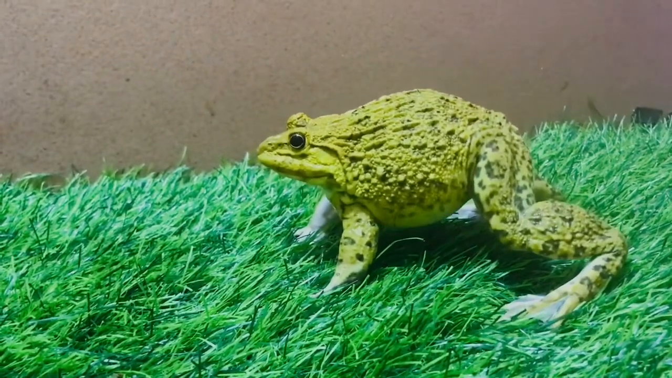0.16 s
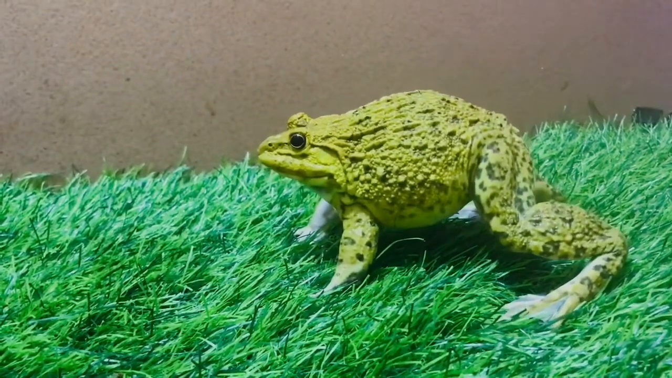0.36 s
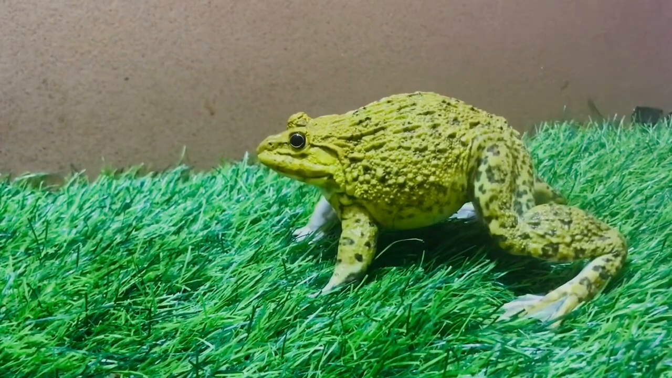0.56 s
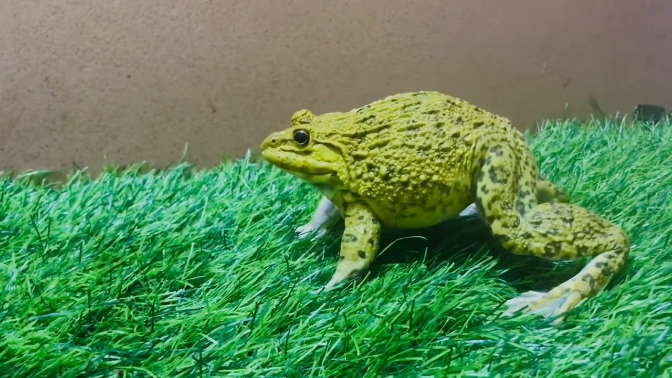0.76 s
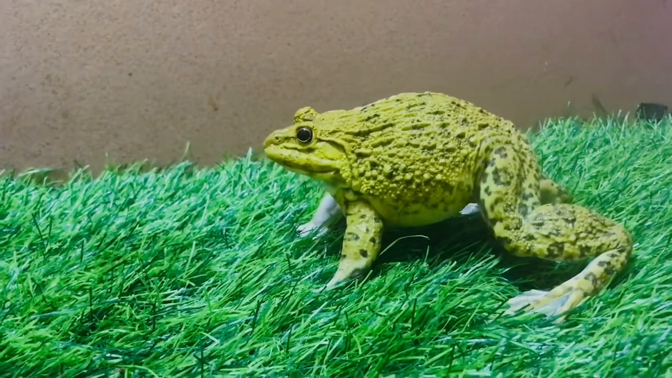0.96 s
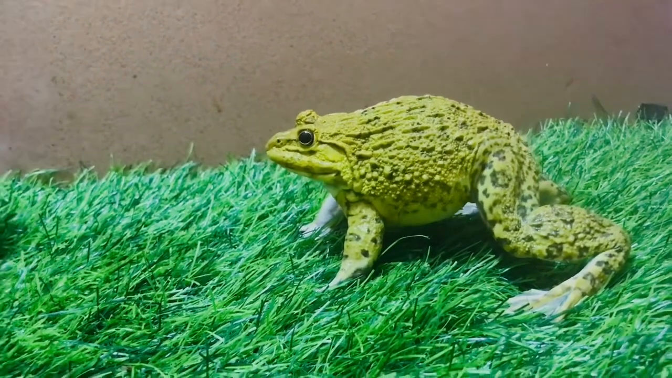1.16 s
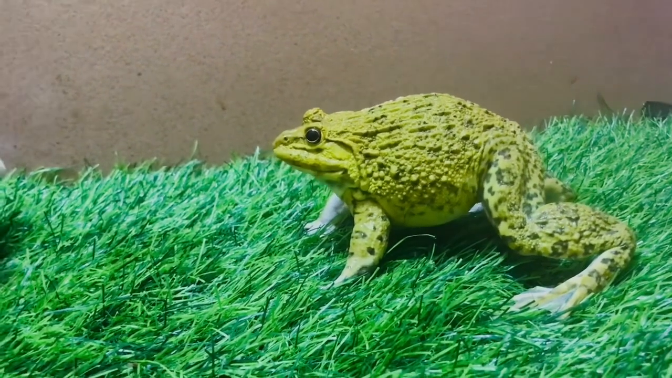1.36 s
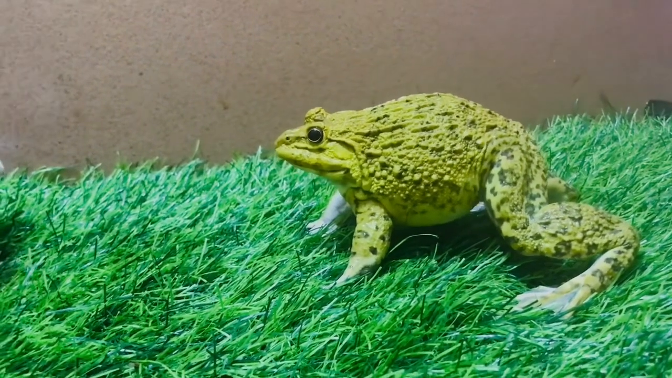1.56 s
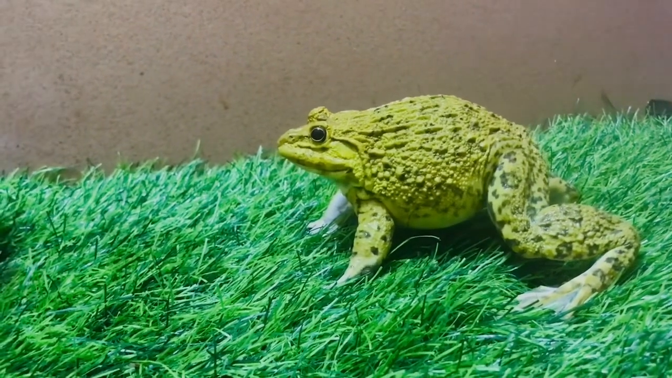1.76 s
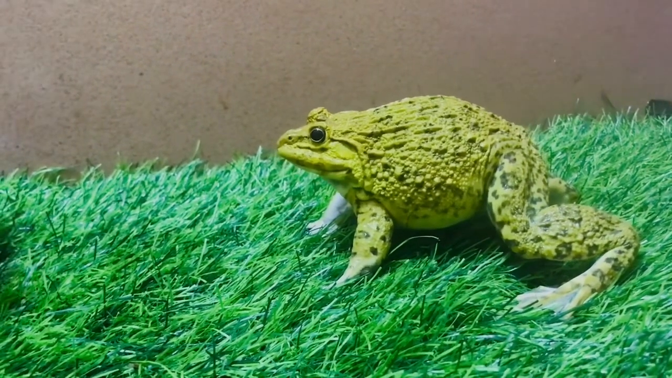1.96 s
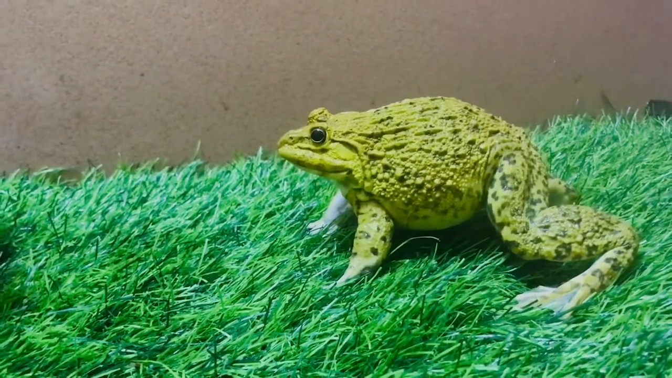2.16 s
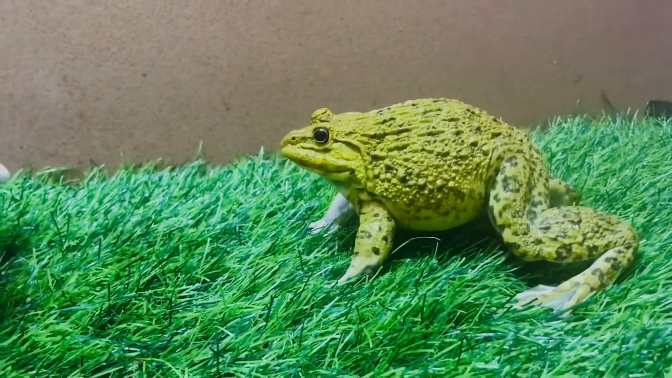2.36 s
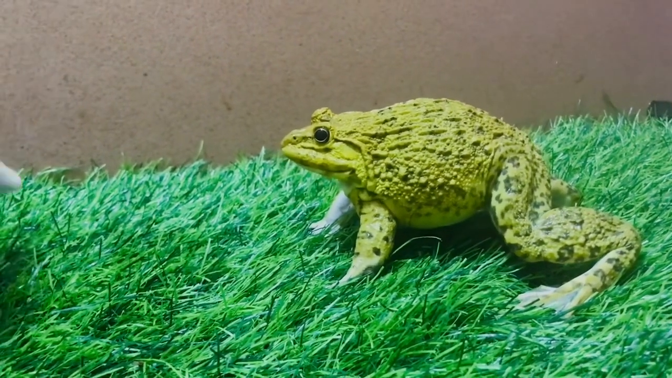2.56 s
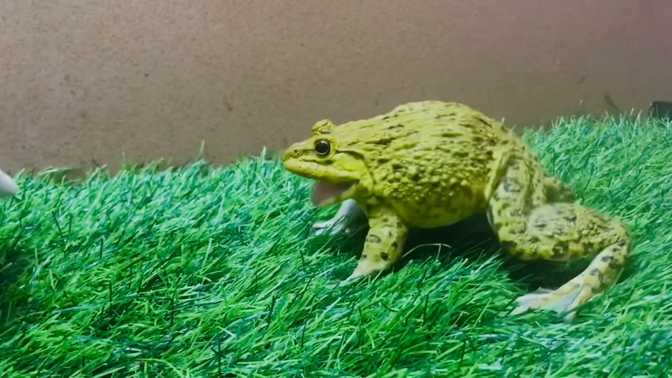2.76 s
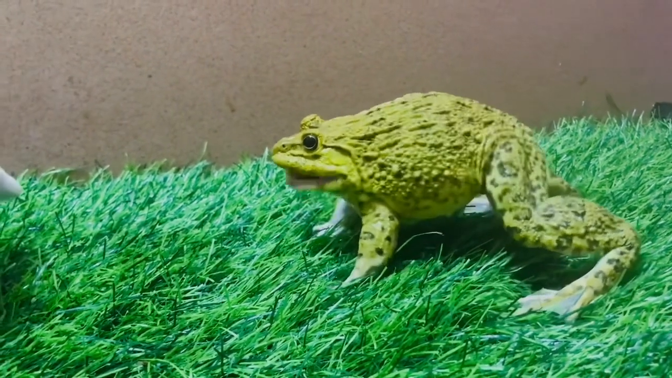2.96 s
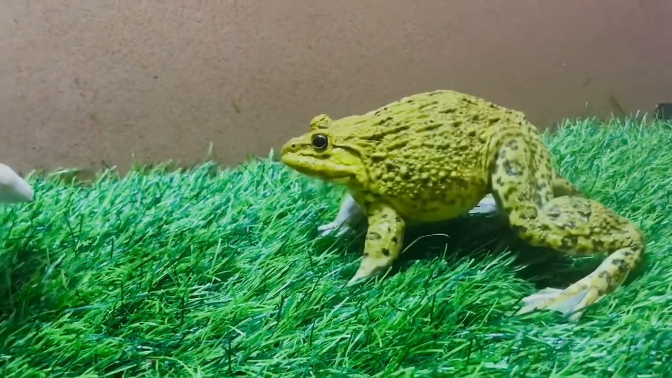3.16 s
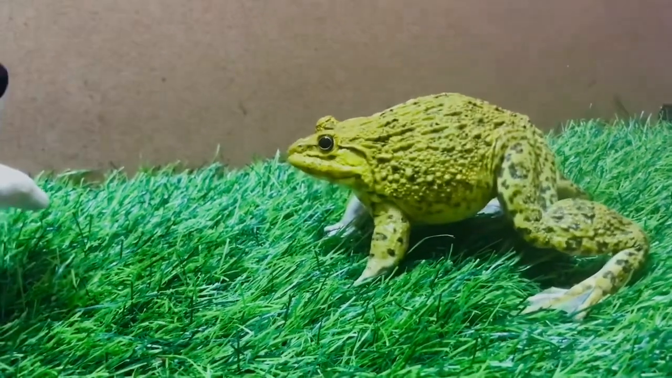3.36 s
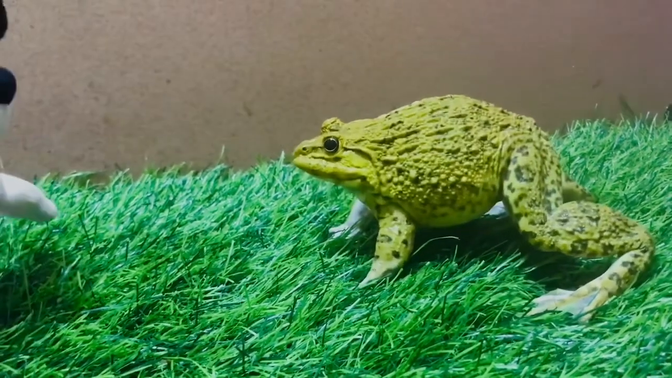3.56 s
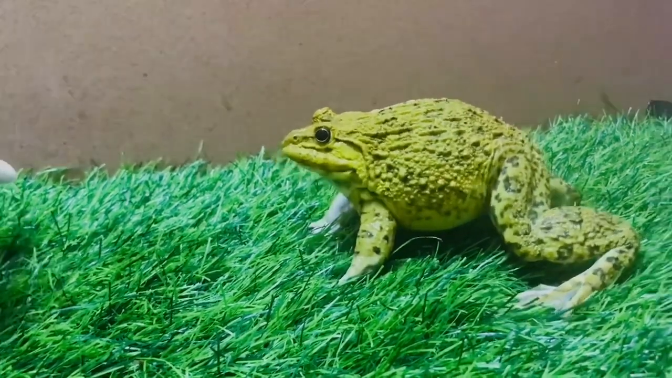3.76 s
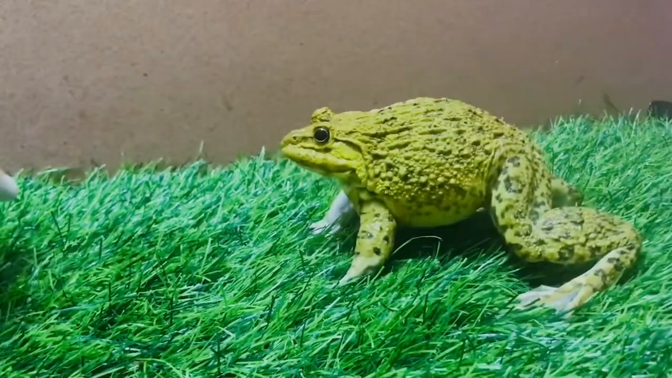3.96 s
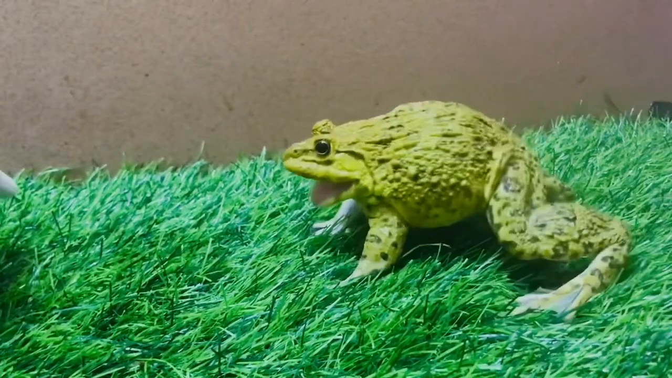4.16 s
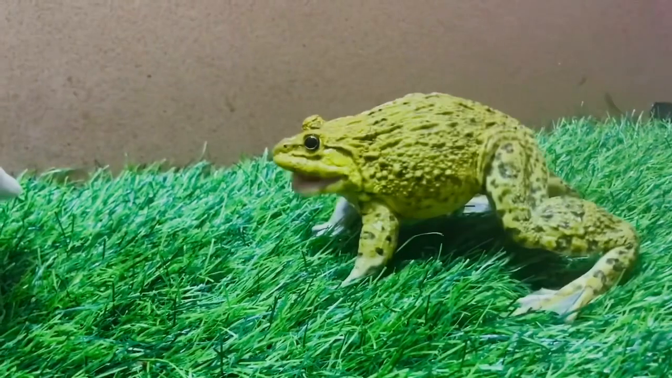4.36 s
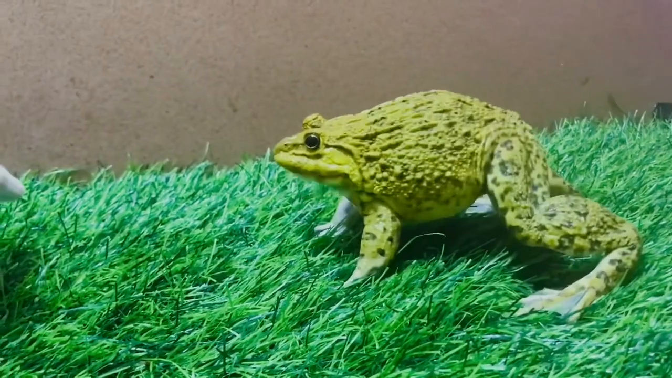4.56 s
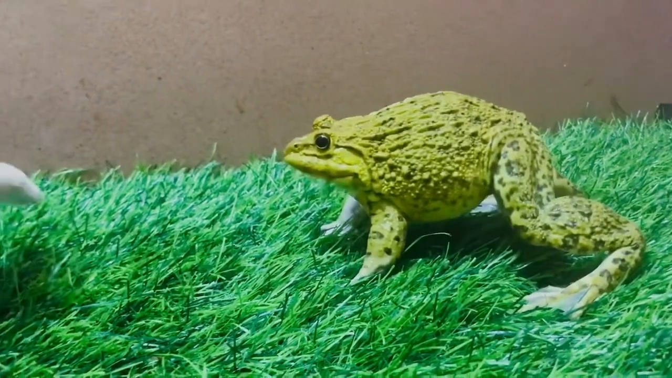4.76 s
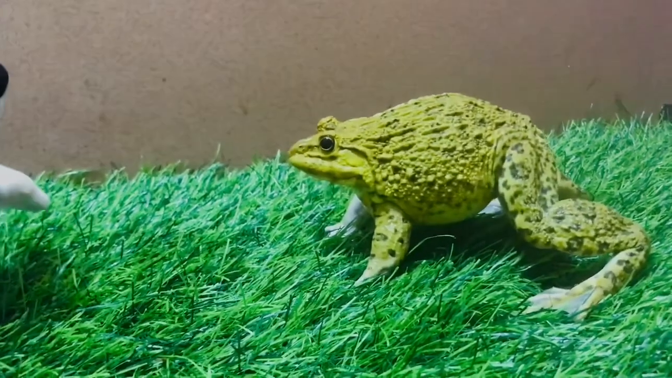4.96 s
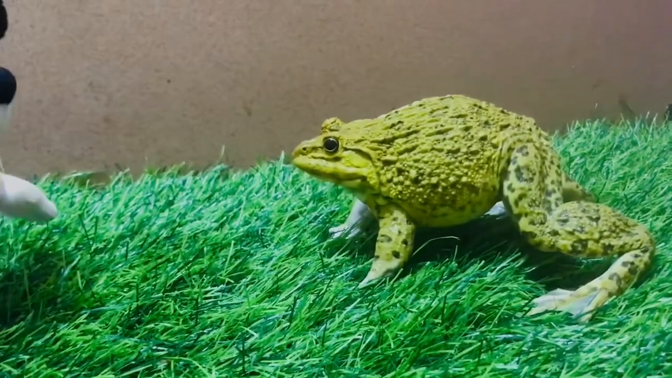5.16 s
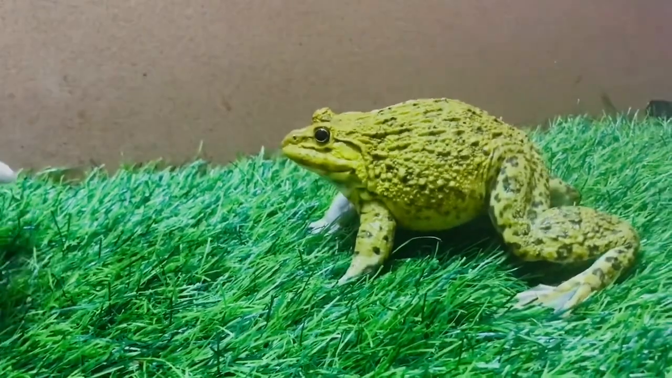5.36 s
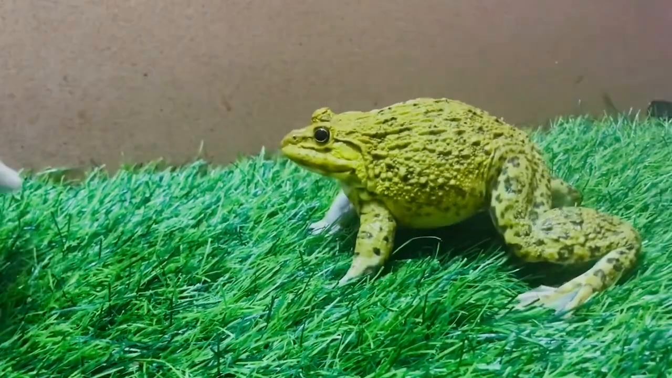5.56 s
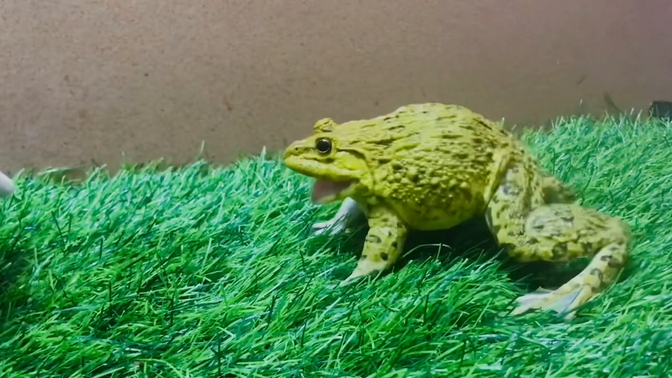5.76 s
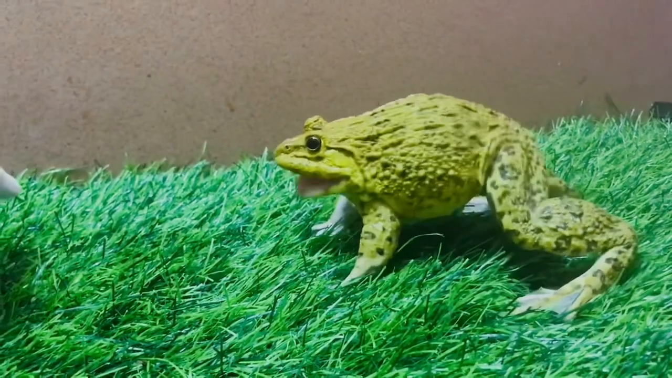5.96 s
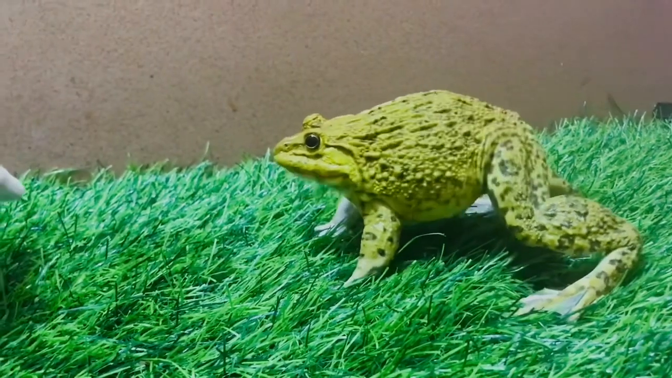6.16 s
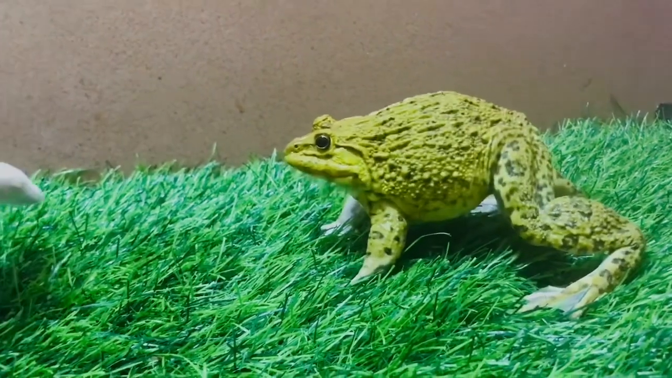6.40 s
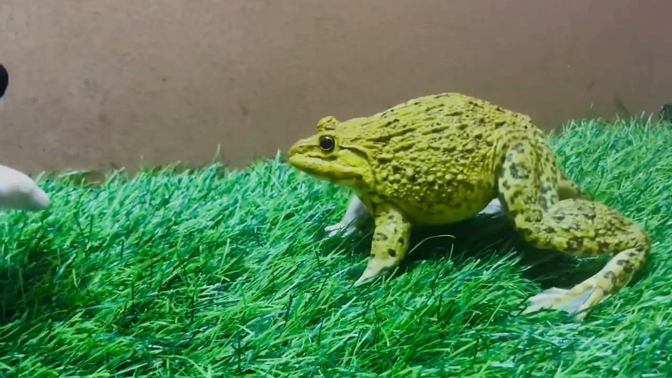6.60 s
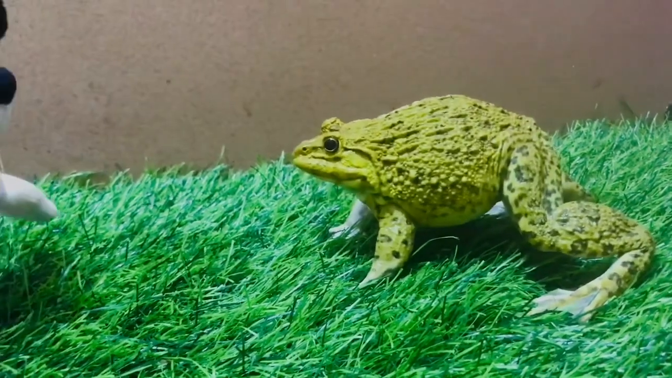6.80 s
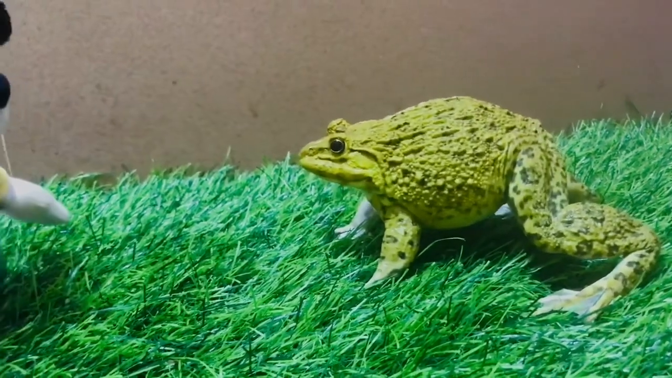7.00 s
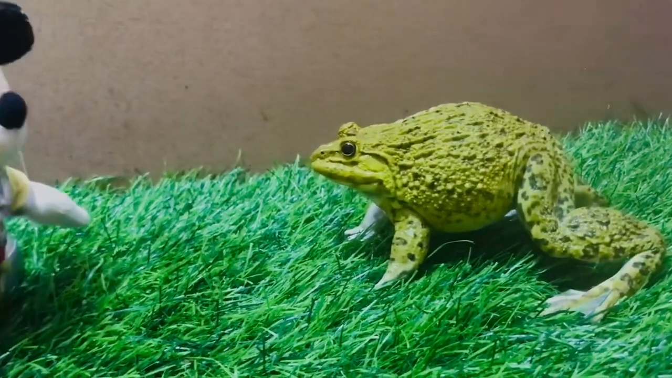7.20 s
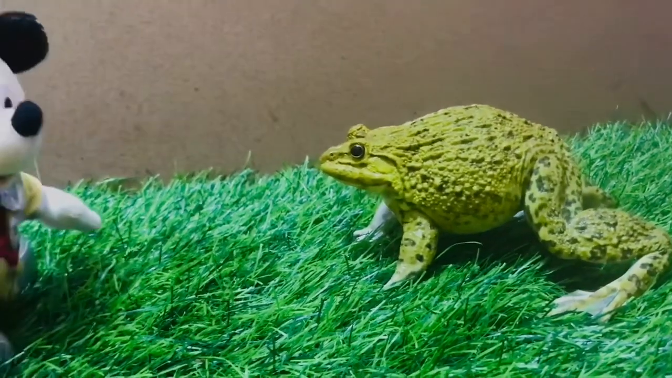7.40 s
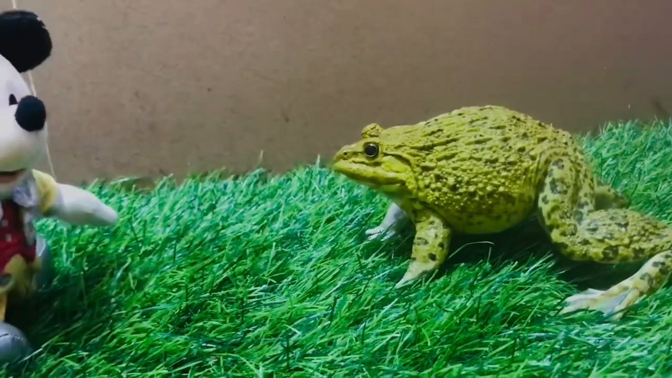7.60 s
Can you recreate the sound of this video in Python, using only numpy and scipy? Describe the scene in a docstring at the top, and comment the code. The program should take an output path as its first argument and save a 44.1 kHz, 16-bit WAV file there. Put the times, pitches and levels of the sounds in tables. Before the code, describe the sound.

A bullfrog gives one short, piercing, falling scream in a small fan-hummed room, then the same scream returns twice, slower and lower.

```python
"""A fan hums and hisses in a small room (wavering sines, shaped noise) as a soft toy brushes plastic turf. The
toy's strokes, ticks and scuffs are swells of band noise; dull low bumps come as short sine bursts. A teased
bullfrog screams once, mouth wide open: a shrill pulse tone through throat resonances shoots up, sinks, breaks
to a lower register and ends in a rasp; the frog then settles with a soft thump."""
import sys
import numpy as np
from scipy import signal
from scipy.fft import rfft, irfft
from scipy.io import wavfile
from scipy.ndimage import uniform_filter1d, minimum_filter1d, map_coordinates

SR = 44100
rng = np.random.default_rng(int(sys.argv[2]) if len(sys.argv) > 2 else 0)


def dump_mix(stems):
    """Bounce the given channels to the path in sys.argv[1] as a 16-bit WAV at rate SR."""
    frames = np.atleast_2d(stems).T  # one column per channel
    limited = np.clip(frames, -1, 1)  # hard clip at full scale
    pcm = np.round(limited * 32767).astype(np.int16)
    wavfile.write(sys.argv[1], SR, pcm)


N = 336744
TIME = np.arange(N) / SR
FREQS = np.arange(N // 2 + 1) * SR / N


def from_db(db):
    """Decibels to gain."""
    return 10 ** (np.asarray(db) / 20)


def rms_one(x):
    """Scale to rms 1."""
    return x / np.sqrt(np.mean(x ** 2) + 1e-20)


def at_hz(points, hz):
    """Read a spectrum, interpolated on a log-frequency axis."""
    point_hz, value = np.transpose(points)
    return np.interp(np.log(np.maximum(hz, 1)), np.log(point_hz), value)


def noise(colour):
    """Noise of a given spectrum, rms 1."""
    white = rfft(rng.standard_normal(N))
    return rms_one(irfft(white * from_db(at_hz(colour, FREQS)), N))


def band_noise(hz, width_hz, size):
    """Noise twice through one resonance, rms 1."""
    centre_hz = min(hz, .45 * SR)
    q = hz / min(np.pi / 2 * width_hz, .4 * SR)
    b, a = signal.iirpeak(centre_hz, q, fs=SR)
    once = signal.lfilter(b, a, rng.standard_normal(size))
    return rms_one(signal.lfilter(b, a, once))


def flutter(rate_hz, size):
    """Random wavering up to a given rate, rms 1."""
    lowpass = signal.butter(2, rate_hz, fs=SR, output="sos")
    return rms_one(signal.sosfilt(lowpass, rng.standard_normal(size)))


def swell(peak_s, length_s, level_db):
    """Gaussian gain around peak_s; length_s is its standard deviation."""
    exponent = np.minimum(((TIME - peak_s) / length_s) ** 2, 200) / 2
    return from_db(level_db) * np.exp(-exponent)


# fan motor lines: [freq_hz, level_db (rms)]
MOTOR_LINES = [(46, -63), (68, -64.5), (100, -56), (345, -62.5)]
# fan rush and hiss spectrum: [freq_hz, relative_density_db]
RUSH_SPECTRUM = [(20, -34.5), (42, -12), (70, 0.5), (110, -8), (135, -9.5), (275, -13.5), (295, -3),
                 (335, -6), (370, -13), (600, -22), (1200, -31.5), (2300, -33.5), (5500, -37.5),
                 (11000, -38.5), (16000, -46)]
# faint whistling bands in the hiss: [centre_hz, width_hz, level_db (rms)]
WHISTLE_BANDS = [(937, 32, -80.5), (1502, 140, -79), (2976, 220, -77.5), (3980, 150, -74),
                 (6870, 260, -80.5), (8990, 210, -77)]


def fan(rush_db=-55, waver=.1, whistle_waver_db=3.5):
    """Wavering motor lines and faint whistles over a low rush and a thin hiss."""
    lines = 0
    for freq_hz, level_db in MOTOR_LINES:
        tone = np.sqrt(2) * np.sin(2 * np.pi * (freq_hz * TIME + rng.random()))
        lines = lines + from_db(level_db) * tone * (1 + waver * flutter(7.1, N))
    whistles = 0
    for centre_hz, width_hz, level_db in WHISTLE_BANDS:
        gain = from_db(level_db + whistle_waver_db * flutter(4.2, N))
        whistles = whistles + gain * band_noise(centre_hz, width_hz, N)
    return lines + whistles + from_db(rush_db) * noise(RUSH_SPECTRUM)


# toy strokes over the turf: [peak_s, length_s, level_db, centre_hz, width_hz]
TOY_STROKES = [(0.783, 0.13, -65.5, 8700, 9100), (1.054, 0.046, -59, 3560, 6000),
               (1.07, 0.034, -59.5, 11300, 2000), (2.047, 0.041, -65, 6770, 10000),
               (2.57, 0.072, -59, 3860, 6500)]
# single blades flick back: [peak_s, level_db]
BLADE_TICKS = [(1.163, -54), (1.175, -58), (3.588, -59), (7.41, -65)]
TICK_S, TICK_HZ, TICK_WIDTH_HZ = 0.0012, 3570, 4000
# toy scuffs the mat as it is shuffled closer: [peak_s, length_s, level_db]
MAT_SCUFFS = [(7.196, .02, -65), (7.261, 0.0027, -56.5), (7.309, .018, -59)]
SCUFF_HZ, SCUFF_WIDTH_HZ = 899, 335
# low rumble of that shuffle
SHUFFLE_AT_S, SHUFFLE_S, SHUFFLE_DB, SHUFFLE_HZ, SHUFFLE_WIDTH_HZ = 7.19, 0.076, -56.5, 200, 130


def toy(grain_db=2.0):
    """Grainy strokes over plastic blades, ticks of single blades, and a scuffing shuffle over the mat."""
    strokes = 0
    for peak_s, length_s, level_db, centre_hz, width_hz in TOY_STROKES:
        strokes = strokes + swell(peak_s, length_s, level_db) * band_noise(centre_hz, width_hz, N)
    tick_gain = sum(swell(peak_s, TICK_S, level_db) for peak_s, level_db in BLADE_TICKS)
    ticks = tick_gain * band_noise(TICK_HZ, TICK_WIDTH_HZ, N)
    scuff_gain = sum(swell(*scuff) for scuff in MAT_SCUFFS)
    scuffs = scuff_gain * band_noise(SCUFF_HZ, SCUFF_WIDTH_HZ, N)
    rumble_gain = swell(SHUFFLE_AT_S, SHUFFLE_S, SHUFFLE_DB)
    rumble = rumble_gain * band_noise(SHUFFLE_HZ, SHUFFLE_WIDTH_HZ, N)
    return (strokes + ticks + scuffs + rumble) * from_db(grain_db * flutter(200, N))


def boom(peak_s, length_s, level_db, hz):
    """A dull, quickly damped sine burst."""
    return swell(peak_s, length_s, level_db) * np.sin(2 * np.pi * hz * (peak_s - TIME))


# dull low bumps: [peak_s, level_db]
LOW_BUMPS = [(.71, -47), (0.949, -45.5), (1.4, -50), (1.889, -47), (2.53, -51), (3.27, -41.5)]
BUMP_S, BUMP_HZ = 0.028, 66.6


def bumps():
    """Dull low bumps, a few cycles each."""
    return sum(boom(peak_s, BUMP_S, level_db, BUMP_HZ) for peak_s, level_db in LOW_BUMPS)


# mat modes under the settling frog: [freq_hz, level_db, length_s]
THUMP_MODES = [(70.5, -37, .009), (175.9, -37, 0.0035)]
THUMP_AT_S = 3.290


def thump():
    """The frog's body drops back on the mat: a dull, quickly damped bump."""
    return sum(boom(THUMP_AT_S, length_s, level_db, hz) for hz, level_db, length_s in THUMP_MODES)


# upper, then lower register; each holds, then sags: [sag_start_s, top_hz, bottom_hz, half_way_after_s]
VOICE_REGISTERS = [(2.70, 1870, 1415, .053), (2.822, 1357, 1030, .027)]
BREAK_AT_S, BREAK_S, SAG_STEEPNESS = 2.811, .0015, 2.3
# cords tighten at the start and go slack at the end; SLACK_HZ is the lowest pitch
TIGHTEN_AT_S, TIGHTEN_S, SLACKEN_AT_S, SLACKEN_S, SLACK_HZ = 2.6668, .0078, 2.867, .035, 390
SCREAM_ON_S, SCREAM_OFF_S = 2.673, 2.878
ATTACK_DB_PER_S, RELEASE_DB_PER_S = 3200.5, 1100
SCREAM_DB, LOSS_DB_PER_OCTAVE = 0.65, 20.5
ONSET_WEAKER_DB, SWELL_S = 5.5, 0.019  # the push still builds after the onset
# roughness 0-1: taut voice, added an octave below the top, added at the onset, ceiling
TAUT_ROUGH, SLACK_ROUGH, ONSET_ROUGH, MOST_ROUGH = 0.074, 0.61, 0.5, 0.81
SETTLE_S = .012  # onset roughness decay


def scream(t):
    """Pitch (Hz), gain and roughness: as the push fades the voice sinks, softens and turns raspy."""
    registers = []
    for sag_start_s, top_hz, bottom_hz, half_s in VOICE_REGISTERS:
        sag = (np.maximum(t - sag_start_s, 0) / half_s) ** SAG_STEEPNESS
        registers.append(bottom_hz + (top_hz - bottom_hz) / (1 + sag))
    upper_hz, lower_hz = registers
    broken = (1 + np.tanh((t - BREAK_AT_S) / BREAK_S)) / 2
    held_hz = upper_hz + (lower_hz - upper_hz) * broken

    tightening = 1 - np.exp(-np.maximum(t - TIGHTEN_AT_S, 0) / TIGHTEN_S)
    slackening = np.exp(-np.maximum(t - SLACKEN_AT_S, 0) / SLACKEN_S)
    pitch_hz = np.maximum(held_hz * tightening * slackening, SLACK_HZ)

    age_s = np.maximum(t - SCREAM_ON_S, 0)
    level_db = SCREAM_DB - LOSS_DB_PER_OCTAVE * np.log2(held_hz.max() / held_hz)
    level_db -= ONSET_WEAKER_DB * np.exp(-age_s / SWELL_S)
    level_db -= ATTACK_DB_PER_S * np.maximum(SCREAM_ON_S - t, 0)
    level_db -= RELEASE_DB_PER_S * np.maximum(t - SCREAM_OFF_S, 0)

    slack = np.log2(held_hz.max() / pitch_hz) ** 3
    rough = TAUT_ROUGH + SLACK_ROUGH * slack + ONSET_ROUGH * np.exp(-age_s / SETTLE_S)
    return pitch_hz, from_db(level_db), np.minimum(rough, MOST_ROUGH)


# resting response of throat and open mouth: [freq_hz, gain_db]
THROAT_RESPONSE = [(400, -14.5), (780, -18.5), (1150, -8), (1500, -4.5), (1900, -14), (2400, -9),
                   (3050, -5), (3600, -7.5), (4400, 2.5), (5500, -2.5), (6150, -7.5), (7300, -4),
                   (9050, -7.5), (9500, -19.5), (11800, -24), (13200, -25.5), (14800, -19.5), (18300, -40),
                   (19200, -70)]
# mouth shape over time: [time_s, resonance_ratio (to resting frequency)]
MOUTH_SHAPE = [(2.675, .97), (2.694, 1.02), (2.725, 1.01), (2.758, .98), (2.805, .95), (2.819, 1),
               (2.86, 1)]


def larynx(pitch_hz, force, rough, waver_db=2.04, rough_waver_db=7, fundamental_db=2, dispersion_rad=0.99):
    """Vocal cord pulses heard through the throat; roughness unsettles their timing and strength."""
    sounding = force > from_db(-60)
    t, pitch_hz, rough = TIME[sounding], pitch_hz[sounding], rough[sounding]
    mouth_ratio = np.interp(t, *np.transpose(MOUTH_SHAPE))
    jitter = .06 * rough * flutter(600, SR)[:len(t)]
    shimmer = .45 * rough * flutter(350, SR)[:len(t)]
    phase = 2 * np.pi * np.cumsum(pitch_hz * (1 + jitter)) / SR
    tone, power = 0, 1e-12
    for k in range(1, 33):
        # steady fundamental; overtones waver, more in a rough voice
        if k == 1:
            own_db = fundamental_db
        else:
            own_db = (waver_db + rough_waver_db * rough) * flutter(61, SR)[:len(t)]
        throat_db = at_hz(THROAT_RESPONSE, k * pitch_hz / mouth_ratio)
        gain = from_db(throat_db + own_db) * (k * pitch_hz < SR / 2)
        # per-partial delay smears each pulse over its cycle
        tone = tone + gain * np.cos(k * phase - dispersion_rad * k * k)
        power = power + gain ** 2 / 2
    out = np.zeros(N)
    out[sounding] = force[sounding] * tone / np.sqrt(power) * (1 + shimmer)
    return out


# leaking air spectrum: [freq_hz, relative_level_db]
AIR_SPECTRUM = [(400, -28.5), (1200, -17.5), (2200, -21), (3600, -1), (5400, 1), (9000, -3.5), (11500, -12),
                (15000, -8), (18300, -21.5), (19200, -67)]
AIR_DB = -4.5  # at roughness 1, relative to the voice
# thin sizzle spectrum: [freq_hz, relative_level_db]
SIZZLE_SPECTRUM = [(9000, -39.5), (12500, -2), (13200, -6), (14700, -2), (17000, -7), (18400, -27.5),
                   (19200, -57)]
# sizzle flares as the larynx opens and shuts: [peak_s, length_s, level_db]
LARYNX_FLARES = [(2.673, .005, -26.5), (2.872, 0.0074, -17.5)]
SIZZLE_DB = -38  # between flares, relative to the voice


def frog():
    """Voiced scream, air rush where the voice is rough, and sizzle; so small a mouth radiates no bass."""
    pitch_hz, force, rough = scream(TIME)
    air = from_db(AIR_DB) * force * rough * noise(AIR_SPECTRUM)
    flares = sum(swell(*flare) for flare in LARYNX_FLARES)
    sizzle = (from_db(SIZZLE_DB) * force + flares) * noise(SIZZLE_SPECTRUM)
    highpass = signal.butter(4, 380, "high", fs=SR, output="sos")
    return signal.sosfilt(highpass, larynx(pitch_hz, force, rough) + air + sizzle)


# room reverberation by band: [freq_hz, relative_level_db]
ROOM_RESPONSE = [(400, -8), (900, -6.5), (1400, -22.5), (2200, -14.5), (3200, -13), (4600, -14),
                 (7000, -20.5), (9000, -10.5), (11000, -4), (14000, -22), (18000, -13.5)]


def room(x, wall_t60_s=0.7, air_hz=12500, build_s=0.0014):
    """Diffuse reverberation that builds up quickly; walls absorb evenly, air takes the treble first."""
    t = TIME[:SR]
    edges_hz = np.geomspace(250, 19000, 25)
    response = 0
    for low_hz, high_hz in zip(edges_hz, edges_hz[1:]):
        hz = np.sqrt(low_hz * high_hz)
        bandpass = signal.butter(2, [low_hz, high_hz], "band", fs=SR, output="sos")
        band = signal.sosfilt(bandpass, rng.standard_normal(SR))
        t60_s = 1 / (1 / wall_t60_s + (hz / air_hz) ** 2)
        decay = from_db(-60 * t / t60_s) * (1 - np.exp(-t / build_s))
        gain = from_db(at_hz(ROOM_RESPONSE, hz))
        response = response + gain * band * decay / np.linalg.norm(decay)
    return signal.fftconvolve(x, response)[:N]


def limiter(x, threshold_db=-7.5, release_db_per_s=38):
    """Gain drops at once on loud sound, holds for 0.2 s, then creeps back; the fan ducks with it."""
    level_db = 10 * np.log10(np.abs(uniform_filter1d(x * x, size=220)) + 1e-12)
    hold = int(.2 * SR) | 1  # odd number of samples
    over_db = np.maximum(level_db - threshold_db, 0)
    held_db = -minimum_filter1d(-over_db, hold, origin=hold // 2)
    release_db = release_db_per_s * TIME
    cut_db = np.maximum.accumulate(held_db + release_db) - release_db
    return x * from_db(-uniform_filter1d(cut_db, size=130))


# playback order: [start_s, live_moment_s, speed_ratio]
PLAYBACK = [(0, 0, 1), (3.76, 2.45212, .8), (5.39333, 2.45212, .8), (7.027, 7.027, 1)]


def replay(live):
    """Resample the live scene by the playback list; the level dips briefly around each slow start."""
    moment_s, gate = np.zeros(N), np.ones(N)
    for start_s, live_s, speed in PLAYBACK:
        moment_s = np.where(TIME >= start_s, live_s + speed * (TIME - start_s), moment_s)
        if speed < 1:
            gate = gate * (1 - .95 * np.exp(-((TIME - start_s) / .017) ** 4))
    return gate * map_coordinates(live, [moment_s * SR], order=5, mode="nearest")


def scene():
    """Frog, room, toy and fan through the limiter, then replayed."""
    voice = frog()
    live = limiter(voice + room(voice) + thump() + bumps() + toy() + fan())
    return replay(live)[None]


CUTOFF_HZ = 16000


def record(dry):
    """The loudest peaks flatten and the top is cut."""
    lowpass = signal.ellip(10, .1, 80, CUTOFF_HZ, fs=SR, output="sos")
    return signal.sosfilt(lowpass, np.clip(dry, -1, 1))


dry = scene()
out = record(dry)
dump_mix(out)
```